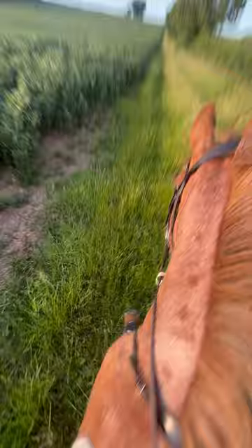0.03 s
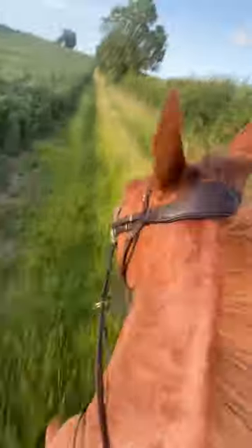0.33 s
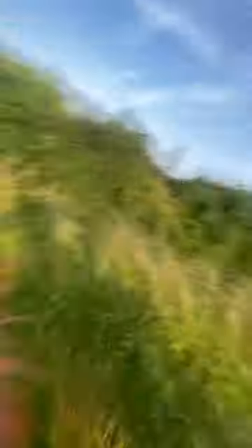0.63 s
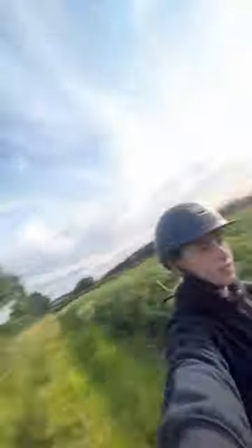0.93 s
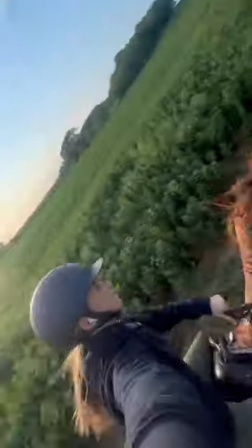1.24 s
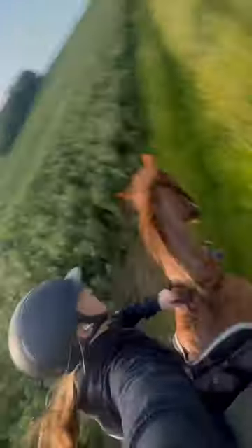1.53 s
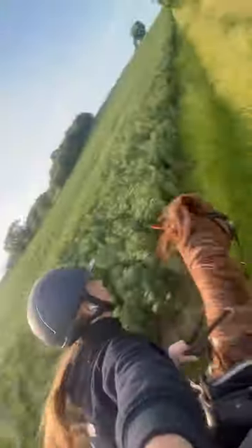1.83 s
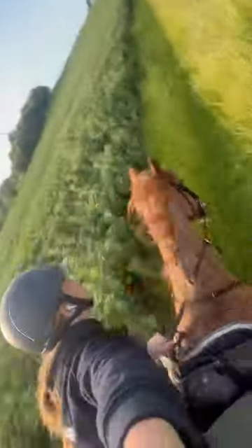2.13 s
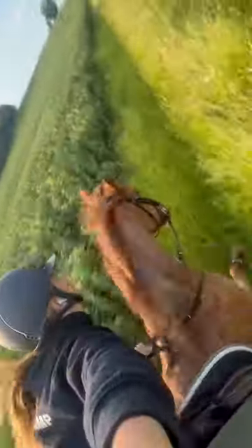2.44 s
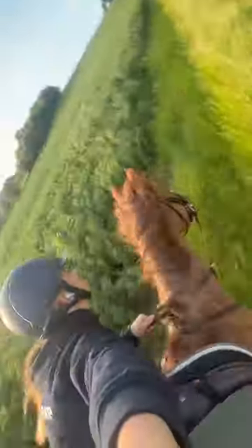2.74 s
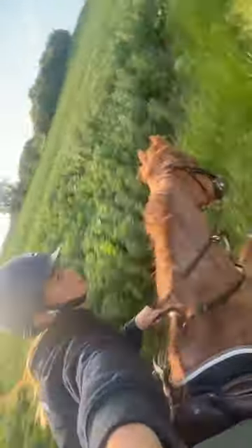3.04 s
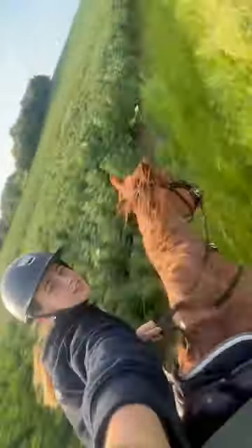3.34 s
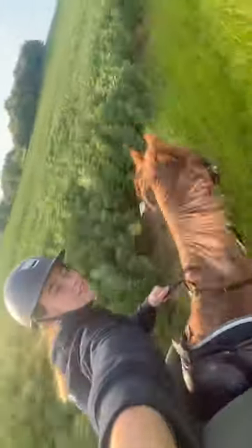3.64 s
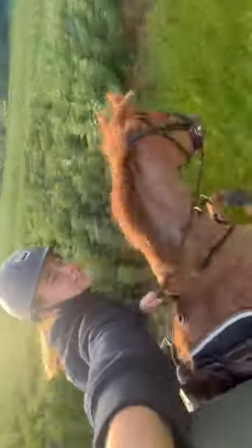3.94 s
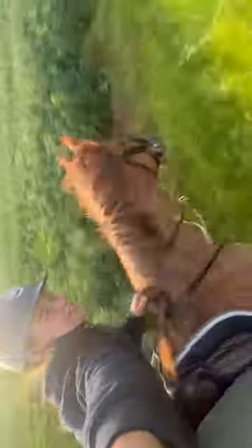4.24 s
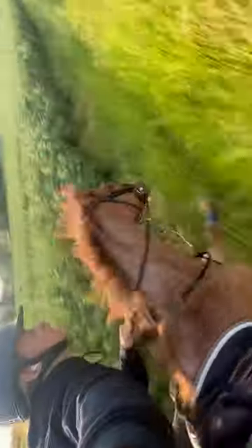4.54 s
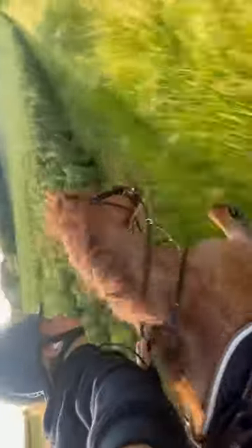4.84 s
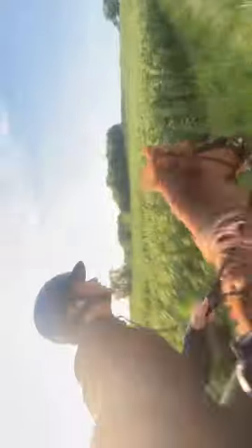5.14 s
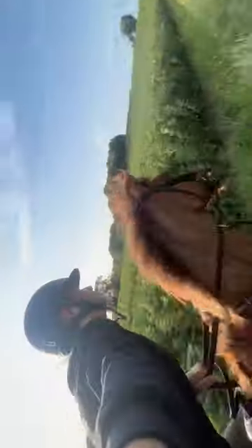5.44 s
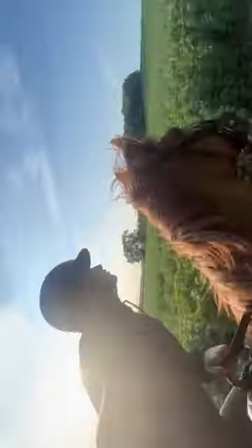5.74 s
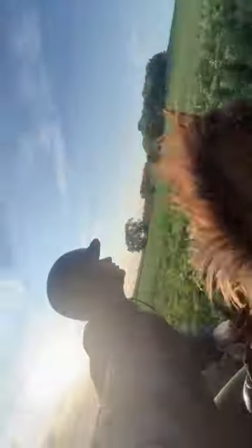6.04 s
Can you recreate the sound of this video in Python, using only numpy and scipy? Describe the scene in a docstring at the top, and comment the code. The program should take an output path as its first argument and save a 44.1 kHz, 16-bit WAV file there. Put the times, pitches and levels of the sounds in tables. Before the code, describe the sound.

Wind rumbles and buffets loudly on a phone held by the rider of a horse galloping along a grassy track. After an early rasping gust and a brief creak of the phone's case, dull hoof thumps grow stronger under the wind. Grass swishes with each stride, mane and sleeve rustle, and buckles tick faintly. Near the end a sleeve brushes past and fingers scrape the case.

```python
"""A horse gallops along a grassy track, heard from a phone held out by the rider.
Hooves and the jolts of each stride thump, loose earth rattles and stalks crunch. Wind rumbles and
buffets as swirls of air hit the phone's two microphone holes. Grass and air hiss in time with the
stride, mane and sleeve rustle, and buckles tick, each tick with a short crackle. The hand makes the
phone's case creak and scrapes over it, and crops hiss faintly all around."""
import sys
import numpy as np
from scipy import signal
from scipy.fft import rfft, irfft
from scipy.io import wavfile
from scipy.ndimage import uniform_filter1d

SR = 44100
rng = np.random.default_rng(int(sys.argv[2]) if len(sys.argv) > 2 else 0)


def store_pcm(level_fs):
    """Save levels as 16-bit WAV."""
    pcm = np.round(np.clip(level_fs, -1, 1) * 32767).astype(np.int16)
    wavfile.write(sys.argv[1], SR, np.atleast_2d(pcm).T)


N = 268128
TIME = np.arange(N) / SR
THUD_PEAK_S = .02  # a thud is strongest this long after its start

# low thumps of hooves, jolts and single puffs of wind: time_s, level_db, pitch_hz, crunch_db
THUMPS = [(0.0639, -19, 366, -49), (0.374, -14, 342, -58), (0.4898, -10.5, 276, -55), (0.498, -9, 169, -64),
          (0.74, -19.5, 550, -69), (0.762, -17, 370, -69), (0.77, -12.5, 248, -69),
          (1.11, -12.5, 380, -37.5), (1.247, -18.5, 450, -66), (1.358, -21, 690, -64),
          (1.445, -11.5, 490, -49), (1.5804, -15.5, 504, -43), (1.644, -11, 440, -59),
          (1.664, -11.5, 377, -56), (1.9137, -8.5, 420, -50), (1.985, -20, 766, -40.5),
          (2.0898, -13.5, 590, -38), (2.2491, -7.5, 590, -43), (2.256, -8, 287.6, -52),
          (2.347, -10.5, 584, -53), (2.3682, -7, 396, -56), (2.4241, -9.5, 397, -54),
          (2.438, -10.5, 407, -62), (2.573, -8, 646, -34), (2.8931, -8.5, 447, -34.5),
          (3.0613, -9, 660, -28), (3.329, -10.5, 400, -58), (3.3805, -13.5, 506, -49),
          (3.449, -17, 486, -37), (3.553, -9.5, 445, -36.5), (3.7733, -5, 446, -55),
          (3.8712, -6.5, 664, -42), (4.019, -9.5, 243, -55), (4.052, -10.5, 430, -30.5),
          (4.2655, -6.5, 600, -36), (4.302, -11, 436, -42), (4.3569, -2.5, 710, -31.5),
          (4.3836, -6, 382, -52), (4.4339, -12, 520, -32), (4.5147, -6, 480, -60), (4.5577, -5.5, 364, -37),
          (4.623, -5, 283, -45), (4.74, -6, 530, -31.5), (4.8158, -4, 311, -41),
          (4.9278, -10.5, 710, -30.5), (5.0234, -7, 740, -31), (5.139, -12, 706, -34),
          (5.235, -0.5, 540, -32), (5.3082, -4, 492, -51), (5.417, -3, 408, -38), (5.5024, -13, 520, -36.5),
          (5.591, -11.5, 590, -45), (5.829, -14, 470, -43), (5.922, -17.5, 630, -38),
          (5.9806, -11, 506, -45), (6.015, -6, 503, -39.5)]
# clicks of the buckles and the bit: start_s, level_db
BUCKLE_TICKS = [(0.0594, -33), (0.828, -48), (0.974, -35.5), (1.1103, -32.5), (1.569, -31.5),
                (1.6073, -32.5), (2.017, -36), (2.088, -34), (2.5743, -30), (2.8908, -28), (2.949, -34),
                (3.062, -27.5), (3.551, -20.5), (3.6534, -31.5), (4.0492, -23.5), (4.4317, -28),
                (4.7374, -29), (4.927, -29), (5.156, -31), (5.825, -25)]
# tone of middle-sized swirls of air: frequency_hz, level_db
BUFFET_TONE = [(70, -32), (130, 0), (190, 4.5), (340, -0.5), (520, -8), (750, -19.5), (1100, -39.5),
               (2000, -54.5)]
# tone of the fine hiss of grass and air, and of the ticks' crackle: frequency_hz, level_db
HISS_TONE = [(2000, -6), (4000, 2.5), (5800, 10), (8000, 5), (10000, 4), (14000, 6), (16000, -1)]


def hooves(scatter_s=0.0029, earth_db=-14, firm_db_per_octave=7):
    """Each blow is a touch, a dry thud that drops in pitch as the ground gives, and a rebound."""
    # the three parts of one blow: delay_s, level_db, pitch_ratio
    blow_parts = [(-.005, -13, 0.89), (.002, -1, 0.98), (.007, -11, 0.77)]
    # tone of loose earth: frequency_hz, level_db
    earth_tone = [(200, -8.5), (450, -2), (800, 4), (1200, -1), (1700, -2.5), (2600, -23), (4000, -57)]
    track = np.zeros(N)
    for s, db, hz, _ in THUMPS:
        for delay_s, part_db, pitch_ratio in blow_parts:
            chance = rng.random(14)
            # the weaker a part, the looser its timing
            loose_s = scatter_s * (1 - undb(part_db)) * (2 * chance[0] - 1)
            part = thud(hz * pitch_ratio, chance[1:], cycles=1.05, fall_octaves=0.56)
            add(track, s + delay_s + loose_s - THUD_PEAK_S, undb(db + part_db) * part)
    times, level_db, hz, _ = np.transpose(THUMPS)
    # earth rattles with each blow, most on firm ground, where the pitch is high
    rattle_db = level_db + earth_db + firm_db_per_octave * np.log2(hz / hz.mean())
    rattle = bursts(times - .001, rattle_db, decay_s=0.0044, rise_s=0.0024)
    return track + colour(rattle, earth_tone)


def thud(hz, chance, cycles, fall_octaves):
    """A few uneven waves of pressure, each lower than the last, passing pitch hz at their strongest."""
    cycle = np.linspace(-5, 5, 201)
    period_s = 2 ** (fall_octaves * cycle) / hz
    t = np.cumsum(period_s) * (cycle[1] - cycle[0])
    uneven = np.interp(cycle, np.linspace(-5, 5, len(chance) - 1), chance[1:] - .5)
    envelope = np.exp(-.5 * (cycle / cycles) ** 2)
    wave = envelope * np.sin(2 * np.pi * (cycle + chance[0] + 0.51 * uneven))
    return np.interp(TIME[:SR // 16] - THUD_PEAK_S, t - t[len(t) // 2], wave, left=0, right=0)


def stalks():
    """Stalks bend and crunch under each hoof."""
    # tone of the crunch: frequency_hz, level_db
    crunch_tone = [(400, -82), (1200, 31.5), (2500, 17), (4500, 4.5), (8000, 5.5), (16000, -24)]
    times, _, _, crunch_db = np.transpose(THUMPS)
    crunch = bursts(times - .004, crunch_db, decay_s=0.0069, rise_s=0.0034)
    return undb(5.5) * colour(crunch, crunch_tone)


def wind():
    """Big swirls of air rumble, middle-sized ones buffet, and the smallest flutter in quick bursts."""
    # tones of the biggest and the smallest swirls: frequency_hz, level_db
    rumble_tone = [(18, -33), (30, -24.5), (48, -3.5), (68, 0.5), (110, -3), (160, -8), (260, -21.5),
                   (500, -57)]
    flutter_tone = [(250, -20.5), (500, 2), (750, 1.5), (1050, -2), (1300, -6), (1650, -15), (2600, -50)]
    rumble_db, buffet_db, flutter_db = wind_levels()
    swirls, surges = wander(120), wander(28)
    rumble = turbulence(rumble_tone, 1.34 * wander(30), span_s=0.1) * undb(rumble_db + 2.25)
    buffet = turbulence(BUFFET_TONE, 4.27 * swirls + 3.9 * surges, span_s=0.085) * undb(buffet_db - 0.33)
    flicker_db = 2.0 * swirls + 2.0 * surges + 3.2 * wander(400)
    flutter = turbulence(flutter_tone, flicker_db, span_s=0.056) * undb(flutter_db - 2.0)
    puff_db = buffet_db + 0.47 * (flutter_db - buffet_db) - 2.5
    return rumble + buffet + flutter + puffs() * undb(puff_db)


def wind_levels():
    """Levels of rumble, buffeting and flutter: a steady flow, lifted by gusts and dropped in lulls."""
    # steady air on the microphone: time_s, rumble_db, flutter_db
    steady_flow = [(0.05, -27.5, -50), (0.31, -30, -75), (0.83, -26, -54), (0.96, -31, -47.5),
                   (1.21, -31, -45), (1.84, -22.5, -41.5), (2.14, -31, -43.5), (2.7, -29, -40),
                   (3.2, -27.5, -37), (3.68, -22.5, -39), (4.08, -19, -21), (4.47, -31.5, -45.5),
                   (4.65, -20, -36.5), (4.91, -26, -31.5), (5.59, -26, -36.5), (5.93, -30.5, -42),
                   (6.08, -34, -32.5)]
    # gusts on top of it: middle_s, length_s, rise_db, extra_rumble_db
    gusts = [(0.304, 0.049, 9, 2), (0.418, 0.11, 11, -1.5), (0.594, 0.31, 18.5, -13.5),
             (0.731, 0.023, 8, -3), (1.043, 0.038, 3.5, 4), (1.195, 0.1, 7.5, -0.5), (1.495, 0.07, 5, -2.5),
             (1.669, 0.15, 9.5, -7.5), (1.93, 0.26, 4.5, -2.5), (2.256, 0.13, 7.5, -0.5),
             (2.38, 0.23, 9.5, 2.5), (2.531, 0.16, 6, 0), (2.953, 0.32, 7, 0), (3.04, 0.052, 2.5, 0.5),
             (3.444, 0.066, 7.5, -1.5), (3.583, 0.18, 7, -5), (3.776, 0.1, 5, -8), (4.287, 0.11, 9.5, 0.5),
             (4.394, 0.089, 9, 2.5), (4.593, 0.21, 8.5, 0.5), (4.807, 0.087, 5.5, -3.5),
             (5.324, 0.08, 4.5, 9.5), (5.747, 0.067, 5, -3.5)]
    # lulls while the phone is sheltered: middle_s, length_s, dip_db, rumble_share
    lulls = [(0.703, 0.04, -7, 0.24), (0.903, 0.085, -14, 0.34), (0.976, 0.049, -15, 0.88),
             (1.295, 0.11, -4, 0.17), (1.416, 0.036, -8.5, .6), (1.562, 0.026, -8.5, 0.93),
             (1.085, 0.045, -5, .7), (3.66, 0.11, -3, 1), (4.319, 0.075, -5.5, 0.62),
             (4.7, 0.057, -2, 0.63), (4.898, 0.17, -4.5, 0.36), (5.102, .09, -1.5, 0.42),
             (5.893, 0.077, -5, 0.63)]
    rumble_db, flutter_db = curves(steady_flow)
    gust_db = sum(db * swell(s, length) for s, length, db, _ in gusts)
    boom_db = sum(db * swell(s, length) for s, length, _, db in gusts)
    lull_db = sum(db * swell(s, length) for s, length, db, _ in lulls)
    rumble_lull_db = sum(share * db * swell(s, length) for s, length, db, share in lulls)
    buffet_db = rumble_db + 0.28 * (flutter_db - rumble_db) + 2.5  # mostly follows the rumble
    return (rumble_db + 0.81 * gust_db + boom_db + rumble_lull_db,
            buffet_db + gust_db + lull_db,
            flutter_db + 1.45 * (gust_db + lull_db))  # small swirls grow fastest in a gust


def puffs(per_second=85, middle_hz=422, spread_octaves=0.35, spread_db=5.5):
    """Single swirls burst on the microphone at random, each a small thud of its own size and pitch."""
    track = np.zeros(N)
    for k, chance in enumerate(rng.random((int(per_second * N / SR), 16))):
        pitch, size = np.sqrt(12) * (chance[1:3] - .5)
        puff = thud(middle_hz * 2 ** (spread_octaves * pitch), chance[3:], cycles=0.99, fall_octaves=0.59)
        add(track, (k + 2 * chance[0]) / per_second, undb(spread_db * size) * puff)
    muffled = signal.sosfilt(signal.butter(6, 1200, fs=SR, output="sos"), track)
    return steady(muffled, span_s=0.12)


def crosswind():
    """As the phone swings round, air pushes on one microphone hole and pulls on the other."""
    # air during the swing: time_s, across_holes_db, on_both_holes_db
    swing = [(0.04, -35.5, -35.5), (0.25, -45, -40), (0.3, -36, -23.5), (0.36, -41, -34),
             (0.42, -33, -21.5), (0.53, -28.5, -25.5), (0.555, -17, -17), (0.6, -22.5, -25.5),
             (0.625, -14, -21), (0.655, -17, -17.5), (0.685, -34, -36)]
    # tone of air crossing the holes: frequency_hz, level_db
    gust_tone = [(150, -61), (260, -17), (380, -11), (520, 1), (700, -6), (1050, -10), (1600, -25),
                 (2800, -47)]
    # tone of the rasp in strong surges: frequency_hz, level_db
    rasp_tone = [(500, -2), (1000, 1.5), (1700, -17), (2600, -26), (3800, -44)]
    across_db, push_db = curves(swing)
    push = turbulence(BUFFET_TONE, 4.3 * wander(119.54), span_s=0.06) * undb(push_db)
    gust = turbulence(gust_tone, 2.0 * wander(200), span_s=0.036) * undb(across_db - 0.5)
    rasp = np.array([turbulence(rasp_tone, 3 * wander(350), span_s=0.096) for _ in range(2)])
    rasp_db = across_db - 2.5 + 1.6 * np.minimum(across_db + 17, 0)  # weak air hardly rasps
    fade_out = np.exp(-np.maximum(TIME - swing[-1][0], 0) / 0.035)
    return fade_out * (dull(push) + np.array([gust, -gust]) + rasp * undb(rasp_db))


def cloth_and_grass():
    """Cloth and mane rustle in coarse grains; grass and air hiss in fine ones."""
    # tone of cloth and mane: frequency_hz, level_db
    rustle_tone = [(600, -8.5), (1300, 5), (2000, 2), (2900, -1.5), (4000, -7.5), (5500, -11),
                   (9000, -22.5)]
    rustle_db, hiss_db = stride_levels()
    grains = wander(55)
    rustle = turbulence(rustle_tone, 4.6 * grains + 0.87 * wander(380), span_s=0.27)
    hiss = turbulence(HISS_TONE, 2.7 * grains + 2.34 * wander(600), span_s=0.079)
    return rustle * undb(rustle_db + 2.5) + hiss * undb(hiss_db + 0.5)


def stride_levels(stride_s=0.4686, fastest_swing_at_s=3.878, swing_db=2.5):
    """Rustle and hiss rise and fall with every stride, and jump when the sleeve brushes by."""
    # average rustle of sleeve and mane: time_s, level_db
    cloth = [(0.07, -51), (0.5, -46), (0.79, -52.5), (1.3, -55), (1.6, -47), (1.76, -54.5), (2.15, -51.5),
             (2.98, -46.5), (3.17, -48.5), (3.93, -44), (4.71, -43), (5.88, -47.5), (6.08, -39.5)]
    # hiss of grass and air between swishes: time_s, level_db
    grass = [(0.05, -51.5), (0.2, -53.5), (0.61, -60.5), (0.72, -61.5), (1.07, -60.5), (1.27, -54),
             (1.72, -54.5), (2.18, -56.5), (2.68, -57), (2.8, -48), (3.62, -51), (4.3, -46.5),
             (5.05, -48.5), (6.08, -45.5)]
    # legs sweep through the grass once a stride: middle_s, length_s, rise_db
    swishes = [(0.393, 0.14, 9.5), (0.96, 0.21, 9.5), (1.453, .1, 2), (1.967, 0.17, 3), (2.45, 0.21, 10.5),
               (2.966, 0.068, 10.5), (3.422, 0.23, 8), (3.898, 0.24, 10.5), (4.37, 0.21, 7.5),
               (4.856, .2, 8), (5.312, 0.12, 7), (5.85, 0.15, 7.5)]
    # the sleeve brushes past the phone: middle_s, length_s, rustle_rise_db, hiss_rise_db
    brushes = [(0.133, 0.061, 5.5, -4), (2.032, 0.099, 3, 0), (2.575, 0.053, 9, 10), (3.055, 0.06, 7.5, 7),
               (3.443, 0.034, 6.5, 0), (3.936, 0.047, 7.5, 5.5), (4.843, 0.059, 4, -0.5),
               (5.337, 0.021, 12, 5.5), (5.4, 0.062, -2, 7), (5.59, 0.1, 14.5, 10), (5.7, 0.15, 12, 8.5)]
    (rustle_db,), (hiss_db,) = curves(cloth), curves(grass)
    rustle_db += swing_db * np.cos(2 * np.pi * (TIME - fastest_swing_at_s) / stride_s)
    rustle_db += sum(db * swell(s, length) for s, length, db, _ in brushes)
    hiss_db += sum(db * swell(s, length) for s, length, db in swishes)
    hiss_db += sum(db * swell(s, length) for s, length, _, db in brushes)
    return rustle_db, hiss_db


def case_snaps(detune=0.033, sides_differ=0.66, focus_db=23, rise_s=.0005):
    """Each slip of the grip strikes the phone's case, which rings a little differently on each side."""
    # snaps and creaks: start_s, peak_db, centre_hz
    slips = [(0.41, -25.5, 2730), (0.411, -25, 940), (0.9255, -19.5, 2820), (0.9264, -19, 900),
             (0.929, -30, 1110), (0.9597, -29, 2390), (0.962, -26, 755), (0.97, -26.5, 1890),
             (3.052, -26, 1500), (5.136, -29, 1600), (5.155, -27, 2000), (5.156, -25, 5500),
             (5.168, -30, 1490)]
    # notes at which the case rings: pitch_hz, level_db, ring_s (time to fade by 60 dB)
    case_notes = [(620, 3.5, 0.032), (840, -0.5, .025), (1030, 3.5, 0.031), (1688, -0.5, .035),
                  (1917, 1, 0.026), (2280, -4.5, 0.023), (2800, -0.5, 0.012), (3240, 4, 0.0071),
                  (5230, 2.5, 0.0045)]
    t, sides = TIME[:SR // 16], np.zeros((2, N))
    hz, note_db, ring_s = np.transpose(case_notes)[:, :, None]
    attack = 1 - np.exp(-(t / rise_s) ** 2)
    for s, db, centre_hz in slips:
        shift, *side_turns = rng.standard_normal((3, len(hz), 1))
        # notes one octave from the centre are focus_db weaker
        gain = undb(note_db - focus_db * np.log2(hz / centre_hz) ** 2 - 60 * t / ring_s)
        phase = 2 * np.pi * (hz * (1 + detune * shift) * t + rng.random((len(hz), 1)))
        for side, turn in zip(sides, side_turns):
            notes = gain * np.sin(phase + sides_differ * turn * hz / hz.mean())
            ring = attack * notes.sum(axis=0)
            add(side, s, undb(db) * ring / np.abs(ring).max())
    return sides


def case_scrapes(shared=0.72, rise_s=0.00063):
    """Fingers and cuff scrape the case; each scrape has its own loudness and brightness."""
    # scrapes: start_s, level_db, brightness_db_per_octave, decay_s
    contacts = [(1.002, -25.5, -5.5, 0.003), (5.578, -25.5, 2, 0.01), (5.609, -28, 7.5, 0.0068),
                (5.713, -22.5, -2.5, 0.011), (5.73, -10.5, -4.5, 0.0035), (5.746, -32, 9, 0.0051)]
    # tone of a scrape on the case: frequency_hz, level_db
    case_tone = [(300, -26), (600, 10), (1100, 16.5), (1350, 9.5), (1750, 9), (2300, -4.5), (3000, -6),
                 (3550, -8), (4100, -9), (6500, -44)]
    t, sides = TIME[:SR // 12], np.zeros((2, N))
    for s, db, brightness, decay_s in contacts:
        envelope = np.exp(-t / decay_s) * (1 - np.exp(-t / rise_s))
        tone = [(hz, level + brightness * np.log2(hz / case_tone[0][0])) for hz, level in case_tone]
        contact = rng.standard_normal(len(t))
        for side in sides:
            scrape = np.sqrt(shared) * contact + np.sqrt(1 - shared) * rng.standard_normal(len(t))
            add(side, s, undb(db) * colour(envelope * scrape, tone))
    return sides


def buckles():
    """Buckles and bit make small, dry clicks, close enough to differ between left and right."""
    # tone of a click: frequency_hz, level_db
    click_tone = [(1500, -12), (4000, -6), (7000, 0), (12000, 1), (16000, -5)]
    times, level_db = np.transpose(BUCKLE_TICKS)
    clicks = [colour(bursts(times, level_db, decay_s=0.001, rise_s=0.0019), click_tone) for _ in range(2)]
    return undb(-7.5) * np.array(clicks)


def tick_crackle(head_start_s=0.0086):
    """A short, grainy crackle around each tick."""
    times, level_db = np.transpose(BUCKLE_TICKS)
    crackle = bursts(times - head_start_s, level_db - 14, decay_s=0.0092, rise_s=0.0068)
    grains = unit(undb(4.8 * wander(900)))
    return colour(crackle * grains, HISS_TONE)


def crops(level_db=-66.5):
    """Crops stir all around in a faint, even hiss."""
    # tone of the crops: frequency_hz, level_db
    crop_tone = [(1800, -7), (2700, -8), (4200, -5), (6500, -10), (12000, -16)]
    return undb(level_db) * colour(rng.standard_normal(N), crop_tone)


def microphone_holes(common, different, mono_below_hz=450):
    """Both holes hear the same bass, but shifted and partly unrelated treble."""
    # how far the left side's wave is ahead: frequency_hz, lead_radians
    left_lead = [(900, 0), (1500, -2.7), (3000, -2.4), (5300, -3.1), (6500, -2.8), (8000, 0), (16000, 11.1)]
    # the part that differs between the holes, against the common part: frequency_hz, level_db
    difference = [(200, -82), (500, -97), (750, -28), (1200, 1), (2000, -6), (3000, -7), (4200, -5.5),
                  (5800, -12.5), (8000, -4.5), (11000, -56)]
    hz = np.fft.rfftfreq(N, 1 / SR)
    spread = undb(on_bins(difference, N))
    lead = np.interp(hz, *np.transpose(left_lead)) * np.clip(hz / mono_below_hz - 1, 0, 1)
    sides = np.array([[1], [-1]])
    both = (rfft(common) + sides * spread * rfft(different)) / np.sqrt(1 + spread ** 2)
    return irfft(both * np.exp(.5j * sides * lead), N)


def dull(x, cutoff_hz=1315):
    """The phone picks up thuds and wind as dull, low sounds; cut their treble steeply."""
    return signal.sosfiltfilt(signal.butter(7, cutoff_hz, fs=SR, output="sos"), x)


def turbulence(tone, swing_db, span_s):
    """Noise that comes in bursts, with its average power over span_s held near 1."""
    return steady(colour(rng.standard_normal(N) * undb(swing_db), tone), span_s)


def bursts(times, levels_db, decay_s, rise_s):
    """Noise that swells quickly at each time and dies away."""
    t, envelope = TIME[:SR // 8], np.zeros(N)
    shape = np.exp(-t / decay_s) * (1 - np.exp(-(t / rise_s) ** 2))
    for s, db in zip(times, levels_db):
        add(envelope, s, undb(db) * shape / shape.max())
    return envelope * rng.standard_normal(N)


def colour(x, tone, size=4096):
    """Filter x to the given tone, falling away beyond the table's ends."""
    (low_hz, low_db), (high_hz, high_db) = tone[0], tone[-1]
    closed = [(low_hz / 2, low_db - 20), *tone, (2 * high_hz, high_db - 40)]
    # fold the filter so that it rings only after a sound, never before
    cepstrum = irfft(np.log(undb(on_bins(closed, size))))
    cepstrum[1:size // 2] *= 2
    cepstrum[size // 2 + 1:] = 0
    response = irfft(np.exp(rfft(cepstrum)))
    return signal.fftconvolve(x, response / np.linalg.norm(response))[:len(x)]


def on_bins(tone, size):
    """A tone table's level at every frequency of a spectrum."""
    hz, db = np.transpose(tone)
    return np.interp(np.log(np.fft.rfftfreq(size, 1 / SR) + 1), np.log(hz), db)


def curves(table):
    """Each column after the time as a value per sample."""
    s, *columns = np.transpose(table)
    return [np.interp(TIME, s, column) for column in columns]


def swell(s, length_s, pointedness=1.07):
    """A smooth rise from 0 to 1 and back, centred on time s."""
    return np.abs(np.cos(np.pi * np.clip((TIME - s) / length_s, -.5, .5))) ** pointedness


def wander(per_second):
    """A curve that glides from one random value to the next; typical size 1."""
    hold = max(int(SR / per_second), 2)
    steps = np.repeat(rng.standard_normal(N // hold + 1), hold)
    return unit(uniform_filter1d(steps, hold)[:N])


def steady(x, span_s):
    """Hold the average power over span_s near 1."""
    width = max(int(span_s * SR), 2)
    power = uniform_filter1d(uniform_filter1d(x ** 2, width), width)
    return x / np.sqrt(np.abs(power) + 1e-12)


def add(track, s, x):
    """Mix x into the track at time s."""
    i = max(int(s * SR), 0)
    track[i:i + len(x)] += x[:max(N - i, 0)]


def unit(x):
    """Scale to an average power of 1."""
    return x / np.sqrt(np.mean(x ** 2))


def undb(db):
    """Decibels to gain."""
    return 10 ** (np.asarray(db) / 20)


def scene():
    """All sources at the phone's two microphone holes."""
    common, different = (dull(wind() + hooves()) + stalks() + cloth_and_grass() + tick_crackle() + crops()
                         for _ in range(2))
    return microphone_holes(common, different) + crosswind() + case_snaps() + case_scrapes() + buckles()


def record(dry, start_s=.035, top_hz=15650):
    """The phone fades in quickly, clips the biggest peaks and cuts the highest treble."""
    fade_in = np.clip((TIME - start_s) / .004, 0, 1)
    clipped = np.clip(dry * fade_in, -.95, .95)
    return signal.sosfilt(signal.ellip(10, .2, 80, top_hz, fs=SR, output="sos"), clipped)


dry = scene()
out = record(dry)
store_pcm(out)
```